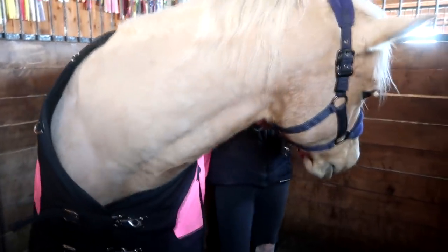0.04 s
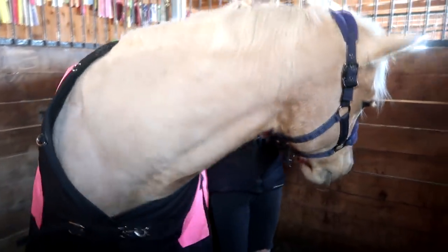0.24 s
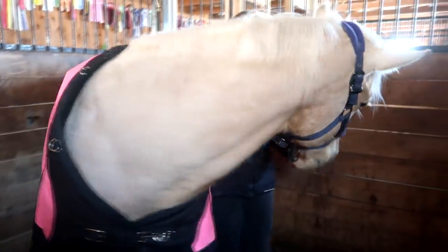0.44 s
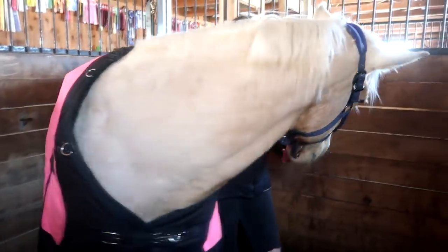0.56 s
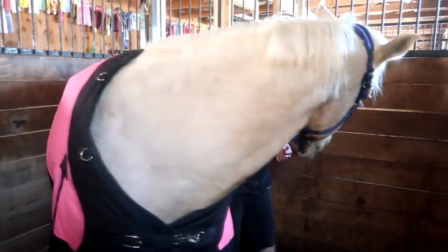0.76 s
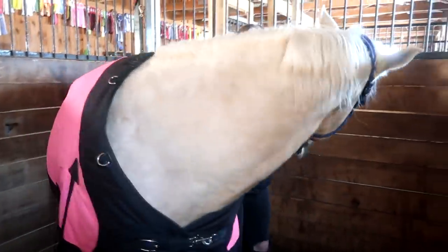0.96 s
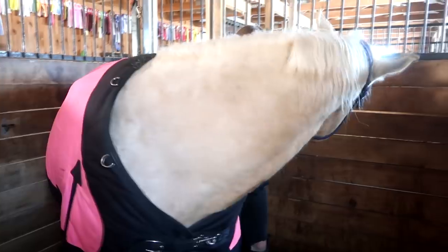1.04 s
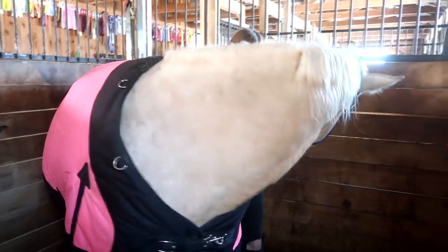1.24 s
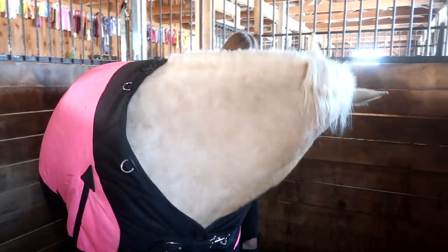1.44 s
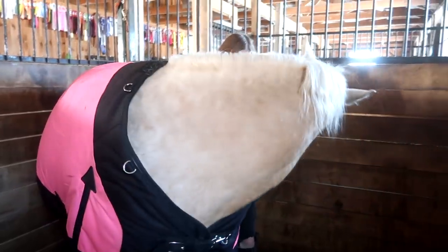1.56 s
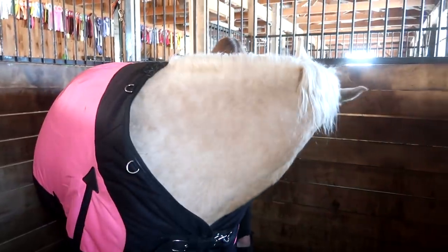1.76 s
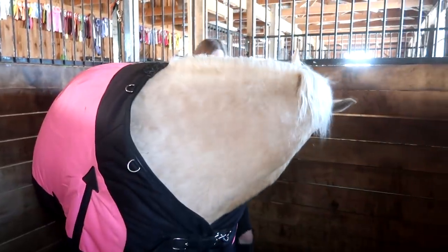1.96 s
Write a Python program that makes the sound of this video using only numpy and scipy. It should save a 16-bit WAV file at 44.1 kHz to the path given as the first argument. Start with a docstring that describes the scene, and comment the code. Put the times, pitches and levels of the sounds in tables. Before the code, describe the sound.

A few short dull hoof knocks and bedding scuffs as a horse shifts in its stall

```python
"""A wooden stall in a humming barn, a close pair of microphones: a horse shifts its weight.
Hooves knock the floor and boards are bumped: decaying modes, with noise cracks on the boards, echoed by the stall.
Bedding scuffs and rustles as grainy noise; the body's weight shuffles as low noise; a hoof edge drags briefly.
A buckle clicks twice and the camera's focus motor ticks faintly, both as short ringing modes.
"""
import sys
import numpy as np
from scipy import signal
from scipy.fft import rfft, irfft
from scipy.io import wavfile
from scipy.ndimage import uniform_filter1d

SR = 44100
rng = np.random.default_rng(int(sys.argv[2]) if len(sys.argv) > 2 else 0)


def int16_out(signal):
    """Quantize to a 16-bit WAV file."""
    q = np.round(np.clip(np.atleast_2d(signal).T, -1, 1) * 32767)
    wavfile.write(sys.argv[1], SR, q.astype(np.int16))


N = 88200
T = np.arange(N) / SR


def amp(db):
    """Amplitude of a level in dB."""
    return 10 ** (np.asarray(db) / 20)


def evened(x):
    """Scales a signal to an rms of one."""
    return x / np.sqrt(np.mean(x ** 2) + 1e-20)


def read(points, hz):
    """Reads a table of values over frequency, straight between points on a log axis."""
    f, value = np.transpose(points)
    return np.interp(np.log(hz + 1), np.log(f + 1), value)


def colour(x, *spectra):
    """Filters by the sum of spectra in dB."""
    hz = np.fft.rfftfreq(N, 1 / SR)
    return irfft(rfft(x) * amp(sum(read(s, hz) for s in spectra)), N)


def stroke(start_s, rise_s, hold_s, t60_s):
    """Envelope of one rub: a straight rise, a hold, then an exponential release."""
    rise = np.clip((T - start_s) / rise_s, 0, 1)
    return rise * amp(-60 * np.maximum(T - start_s - rise_s - hold_s, 0) / t60_s)


def ring(modes, pitch=1, hard_db=0, damping=1):
    """Decaying sines of one struck object; a harder blow (dB per octave) lifts the high modes."""
    t = T[:SR // 5]
    knee_hz = modes[len(modes) // 3][0]
    sound = np.zeros(len(t))
    for k, (hz, db, t60) in enumerate(modes):
        lift_db = hard_db * max(np.log2(hz / knee_hz), 0)
        decay = amp(db + lift_db - 60 * damping * t / t60)
        sign = (-1) ** (k + 1)  # neighbouring modes start in opposite directions
        sound += sign * decay * np.sin(2 * np.pi * hz * pitch * t)
    return sound


def strike(modes, s, db, pitch, rise_ms, hard_db):
    """A blow sets the object ringing after a short exponential rise, scaled to a peak level."""
    rise = 1 - np.exp(-T[:SR // 5] * 1000 / rise_ms)
    sound = ring(modes, pitch, hard_db) * rise
    out, at = np.zeros(N + len(sound)), round(s * SR)
    out[at:at + len(sound)] = amp(db) * sound / abs(sound).max()
    return out[:N]


def wash(tone, side, patchy_db):
    """Noise of a given colour with patches drifting over time and frequency; mid and side."""
    frames, hz = N // 256 + 5, np.fft.rfftfreq(1024, 1 / SR)
    a, b, c, d, patches = rng.standard_normal((frames, 513, 5)).T
    patches = uniform_filter1d(patches, size=10, axis=0)
    patches = evened(uniform_filter1d(patches, size=10, axis=1))
    mid_bins = a + 1j * b
    side_bins = (c + 1j * d) * amp(read(side, hz))[:, None]
    level_db = read(tone, hz)[:, None] + patchy_db * patches
    bins = np.array([mid_bins, side_bins]) * amp(level_db)
    x = signal.istft(bins, nperseg=1024, noverlap=768)[1][:, :N]
    return x / np.std(x[0])


# colour of the barn behind: (frequency [Hz], relative level [dB per Hz])
BARN_TONE = [(20, -4.5), (45, -26), (75, 2), (130, -10), (250, -10.5), (500, -12.5), (1000, -13),
             (2200, -21.5), (4000, -27), (7000, -35.5), (11000, -42.5), (13000, -52), (15000, -60)]
# width of sound from all around the barn: (frequency [Hz], side minus mid [dB])
BARN_WIDTH = [(60, -37), (110, -9.5), (200, -2.5), (380, 0), (700, -7.5), (1290, -7.5), (2370, -5),
              (4380, -1), (8080, -0.5), (14900, 6)]
BARN_DB = -50.5  # rms in the mid


def barn():
    """The barn's hum and air: steady, slightly patchy wide noise; mid and side."""
    return amp(BARN_DB) * wash(BARN_TONE, BARN_WIDTH, patchy_db=.8)


# focus motor modes before the pitch factor: (frequency [Hz], relative level [dB], t60 [s])
MOTOR_MODES = [(4400, 0, .012), (5400, -4, .012)]
# focus motor ticks: (time [s], peak level in the side [dB])
MOTOR_TICKS = [(0.359, -47), (0.386, -51), (0.405, -56), (0.465, -38), (.587, -51), (0.658, -45),
               (0.685, -43), (0.692, -44), (0.718, -42), (0.725, -41), (.753, -46), (0.758, -43),
               (0.791, -44), (0.985, -47), (1.087, -55), (1.107, -42), (1.454, -45), (1.485, -43),
               (1.572, -47), (1.619, -47), (1.717, -51), (1.753, -51), (1.77, -46), (1.821, -44),
               (1.969, -41)]
TICK_MID_DB = -7  # mid relative to side


def motor():
    """Ticks carried through the camera body, strong in the side signal; mid and side."""
    ticks = sum(strike(MOTOR_MODES, s, db, pitch=0.93, rise_ms=0.25, hard_db=0) for s, db in MOTOR_TICKS)
    late = np.roll(ticks, 3)  # the mid lags by 3 samples
    return np.array([amp(TICK_MID_DB) * late, ticks])


# low shuffle of the body's weight on the floor: (time [s], level [dB])
SHUFFLE_LEVEL = [(0, -47), (.3, -55.5), (.45, -41), (.62, -53), (.8, -57.5), (.9, -41), (1.05, -59),
                 (1.5, -61), (1.62, -50), (1.7, -44), (1.8, -45.5), (1.88, -40), (2, -49)]
# colour of the shuffle: (frequency [Hz], relative level [dB per Hz])
SHUFFLE_TONE = [(50, -14), (90, 3), (135, 3), (200, 3), (290, 0.5), (500, -1.5), (900, -19), (2000, -57.5)]
# width of sources close to the microphones: (frequency [Hz], side minus mid [dB])
NEAR_WIDTH = [(60, -30), (120, -23.5), (250, -27.5), (500, -20), (1300, -12), (2400, -8.5), (4400, -3.5),
              (8000, 2.5), (15000, 11)]


def shuffle():
    """Low noise of the weight moving on the floor, swelling and easing; mid and side."""
    level_db = np.interp(T, *np.transpose(SHUFFLE_LEVEL))
    return amp(level_db) * wash(SHUFFLE_TONE, NEAR_WIDTH, patchy_db=1.5)


# scuffs through the bedding:
# (time [s], rise [s], hold [s], release t60 [s], grit level [dB], hiss level [dB], floor ring level [dB])
SCUFFS = [(.0, 0.011, 0.024, 0.9, -60, -87, -45.5), (0.104, 0.026, 0.015, 0.26, -41, -52, -44),
          (0.206, 0.012, .03, 0.66, -58.5, -62, -47.5), (0.354, 0.025, 0.097, 0.67, -48, -61.5, -47),
          (0.427, 0.14, 0.0065, 0.34, -45.5, -54.5, -43.5), (0.792, 0.011, 0.05, 0.21, -37.5, -45, -43.5),
          (0.853, 0.012, 0.019, 0.48, -48.5, -59, -44), (1.022, 0.011, 0.017, 0.37, -55, -70, -53),
          (1.329, 0.0037, 0.0087, 0.18, -45, -75, -69), (1.371, 0.17, 0.025, 0.35, -49, -60, -58.5),
          (1.598, 0.005, 0.017, 0.35, -52, -62.5, -60), (1.63, 0.028, 0.15, .2, -58, -66, -81),
          (1.829, 0.01, 0.025, 0.18, -43, -53, -37), (1.878, 0.011, 0.016, 0.39, -55, -63, -45),
          (1.933, 0.027, 0.02, .3, -59, -63, -55)]
# colour of the coarse grit: (frequency [Hz], relative level [dB per Hz])
GRIT_TONE = [(400, -54), (800, 2), (1400, 0.5), (2500, -2), (3600, -10), (5500, -70), (9000, -42.5)]
# colour of the fine hiss: (frequency [Hz], relative level [dB per Hz])
HISS_TONE = [(2000, -33), (3500, -1), (4500, 0.5), (6500, -5.5), (10000, -18), (12000, -31.5), (15000, -59)]
# near floor, before pitch and damping factors: (frequency [Hz], relative level [dB], t60 [s])
FLOOR_MODES = [(95, -28, .07), (220, -14, .05), (290, -18, .05), (390, 0, .046), (540, -16, .035),
               (700, -1, .046), (950, -21, .04), (1200, -24, .035)]
GRAINS_PER_S, GRAIN_SPREAD_DB = 5000, 1
CLUMP_DB, CLUMP_S = 1.5, .012  # depth and window length of the clumping


def scuffs():
    """Dense, clumped grains of bedding under each stroke grind, hiss and set the floor ringing; mid and side."""
    present = rng.random(N) < GRAINS_PER_S / SR
    grains = amp(GRAIN_SPREAD_DB * np.minimum(rng.exponential(1, N), 5)) * present
    clump_window = np.hanning(round(CLUMP_S * SR))
    drift = evened(signal.oaconvolve(rng.standard_normal(N), clump_window, "same"))
    # 0.51 keeps a bed of noise between the grains
    grains = (grains + 0.51) * amp(CLUMP_DB * drift) * rng.standard_normal((3, N))

    power = np.zeros((3, N))  # overlapping strokes add in power
    for s, rise, hold, t60, *db in SCUFFS:
        power += (amp(db)[:, None] * stroke(s, rise, hold, t60)) ** 2
    grit, hiss, floor = np.sqrt(power)

    out = np.zeros((2, N))
    for tone, level in [(GRIT_TONE, grit), (HISS_TONE, hiss)]:
        mid = colour(grains[0], tone)
        side = colour(grains[1], tone, NEAR_WIDTH)
        out += np.array([mid, side]) / np.std(mid) * level
    rubbed = ring(FLOOR_MODES, pitch=0.95, hard_db=-2, damping=1.8)
    out[0] += evened(signal.oaconvolve(grains[2], rubbed)[:N]) * floor
    return out


# buckle modes before the pitch factor: (frequency [Hz], relative level [dB], t60 [s])
BUCKLE_MODES = [(2150, -5, 0.0054), (2540, -7, 0.0078), (3220, -5.5, 0.0085)]
# buckle clicks: (time [s], peak level [dB], hardness [dB per octave])
BUCKLE_CLICKS = [(0.779, -43, -7), (1.2346, -31, 16)]


def buckle():
    """Dry ringing clicks close by; mid and side."""
    clicks = sum(strike(BUCKLE_MODES, s, db, 0.936, 0.85, hard) for s, db, hard in BUCKLE_CLICKS)
    return np.array([clicks, colour(clicks, NEAR_WIDTH)])


# floor under the dragging hoof edge: (frequency [Hz], relative level [dB], t60 [s])
DRAG_MODES = [(422, 0, .16), (688, 1, .14), (1020, -8, .09), (1350, -9, .07), (2560, -12, .03)]
DRAG_S, DRAG_RISE_S, DRAG_HOLD_S, DRAG_T60_S, DRAG_DB = .803, 0.004, 0.043, 0.075, -30.5


def drag():
    """Friction noise keeps a few narrow resonances singing while the hoof edge slides; mid only."""
    singing = evened(signal.oaconvolve(rng.standard_normal(N), ring(DRAG_MODES))[:N])
    mid = amp(DRAG_DB) * stroke(DRAG_S, DRAG_RISE_S, DRAG_HOLD_S, DRAG_T60_S) * singing
    return np.array([mid, np.zeros(N)])


# decay of the stall's echoes: (frequency [Hz], t60 [s])
STALL_DECAY = [(100, 0.077), (400, 0.43), (1500, 0.41), (6000, 0.59)]
FIRST_ECHO_S = 0.006027
STALL_DB, STALL_SIDE_DB = -4.5, -14.5  # echoes; extra gain of their side, on top of the barn width
DIRECT_SIDE_DB = -1  # direct sound's side, on top of the near width


def stall(x):
    """Sparse random echoes, each band dying at its own speed, join the direct sound; mid and side."""
    taps = np.zeros((2, SR))
    # one echo at a random place in every 20 samples, of random sign
    at = np.arange(round(FIRST_ECHO_S * SR), SR - 20, 20)
    places = at + rng.integers(0, 20, (2, len(at)))
    np.put_along_axis(taps, places, rng.choice([-1., 1.], (2, len(at))), 1)
    hz, t, z = signal.stft(taps, SR, nperseg=256)
    decay = amp(-60 * t / read(STALL_DECAY, hz)[:, None])
    tail = signal.istft(z * decay, SR, nperseg=256)[1]
    tail = tail / np.linalg.norm(tail[0])
    echo_mid, echo_side = amp(STALL_DB) * signal.fftconvolve(x[None], tail, axes=1)[:, :N]
    echo_side = amp(STALL_SIDE_DB) * colour(echo_side, BARN_WIDTH)
    turned = signal.hilbert(x).imag  # a quarter turn of phase spreads the direct sound
    direct_side = amp(DIRECT_SIDE_DB) * colour(turned, NEAR_WIDTH)
    return np.array([x + echo_mid, echo_side + direct_side])


# wall boards before the pitch factor: (frequency [Hz], relative level [dB], t60 [s])
BOARD_MODES = [(235, -7, .05), (530, -7, .045), (605, -5, .05), (800, 0, .045), (920, -8, .04),
               (1060, -10, .04), (1360, -11, .035), (1600, -13, .03), (1880, -12, .03), (2500, -15, .025),
               (2950, -16, .025), (3580, -20, .025)]
# bumps on a wall board, before the stall's echoes: (time [s], peak level of the ring [dB], pitch factor,
# rise [ms], hardness [dB per octave], crack relative to that peak [dB])
BUMPS = [(.022, -35.5, 1.1, 2, -2.5, -14), (.1205, -22, 0.97, 3.2, -6, -30), (.145, -32, 0.8, 1, -2, -15),
         (.155, -27, 1.07, 0.41, 0, -10), (.178, -31, 0.92, 0.93, -3, -22),
         (0.2267, -17.5, 1.025, 0.24, -1.5, -11.5), (.233, -22, 0.99, 1.5, -17, -24.5),
         (.2515, -28, 0.81, 0.43, 2.5, -16), (.281, -37, 1.05, 1, -4, -8),
         (1.335, -35.5, 1.13, 0.82, 4, -8), (1.344, -41, 1.084, 1, 7, -8)]
# colour of the crack: (frequency [Hz], relative level [dB per Hz])
CRACK_TONE = [(500, -17), (1000, 14.5), (1900, 7), (3000, -4), (5000, -16), (12000, -63)]
CRACK_RISE_S, CRACK_T60_S = 0.0015, 0.073


def board_bumps():
    """Each bump rings the board's modes and adds a short noise crack."""
    rings, crack = np.zeros(N), np.zeros(N)
    for s, db, pitch, rise_ms, hard_db, crack_db in BUMPS:
        rings += strike(BOARD_MODES, s, db, pitch, rise_ms, hard_db)
        decay = amp(db + crack_db - 60 * np.maximum(T - s, 0) / CRACK_T60_S)
        crack += decay * np.clip((T - s) / CRACK_RISE_S, 0, 1)
    return rings + crack * evened(colour(rng.standard_normal(N), CRACK_TONE))


# the far plank, before the pitch factor: (frequency [Hz], relative level [dB], t60 [s])
FAR_MODES = [(135, -10, .06), (205, -11, .06), (350, 0, .045), (450, -12, .09), (530, -2, .045),
             (690, -5, .05), (880, -14, .04), (1330, -20, .03)]
# the toe of the hoof, before the pitch factor: (frequency [Hz], relative level [dB], t60 [s])
TOE_MODES = [(115, -14, .05), (480, 0, .03), (640, -12, .03), (2600, -22, .02)]
# The three lists of blows below, all before the stall's echoes, share these columns:
# (time [s], peak level [dB], pitch factor, rise [ms], hardness [dB per octave])
# hoof on the near floor
HOOVES = [(0.043, -41, 0.68, 0.97, 9), (.3772, -7.5, 1.03, 2, -2), (0.3867, -18, 1.3, 0.35, 3),
          (0.403, -25.5, 0.75, 2.1, 0), (.412, -26, 1.01, 0.61, 14.5), (.422, -42, 0.87, 1.2, 4),
          (.442, -27, 0.82, 2.5, -10), (.507, -26.5, 0.907, 1.2, 6), (.534, -27.5, 0.88, 1.3, 2.5)]
# hoof on the far plank
FAR_HOOVES = [(1.8307, -17, 1, 2.3, -2), (1.838, -24, 1, 0.76, 3.5), (1.852, -26.5, 0.986, 1.46, 2.5),
              (1.886, -32.5, 1.15, 2, -1), (1.905, -36, 1.12, 1.6, -2), (1.935, -35.5, 1.05, 3, -12)]
# toe stubs before the drag
TOES = [(0.7949, -23, 0.92, 0.63, -6), (.799, -21, 1.025, 1.1, 3)]


def hooves():
    """Hooves knock the near floor and the far plank, and a toe stubs: each blow rings its own modes."""
    struck = [(FLOOR_MODES, HOOVES), (FAR_MODES, FAR_HOOVES), (TOE_MODES, TOES)]
    return sum(strike(modes, *blow) for modes, blows in struck for blow in blows)


def scene():
    """Sums all layers as mid and side, then opens them to left and right."""
    behind = barn() + motor()
    bedding = shuffle() + scuffs()
    close_by = buckle() + drag()
    knocks = stall(board_bumps() + hooves())
    mid, side = behind + bedding + close_by + knocks
    return np.array([mid + side, mid - side])


EDGE_HZ = 15300


def record(dry):
    """The microphone channels' band limit: a steep low-pass."""
    low_pass = signal.firwin(511, EDGE_HZ, window=("kaiser", 9), fs=SR)
    return signal.oaconvolve(dry, low_pass[None], "same")


dry = scene()
out = record(dry)
int16_out(out)
```